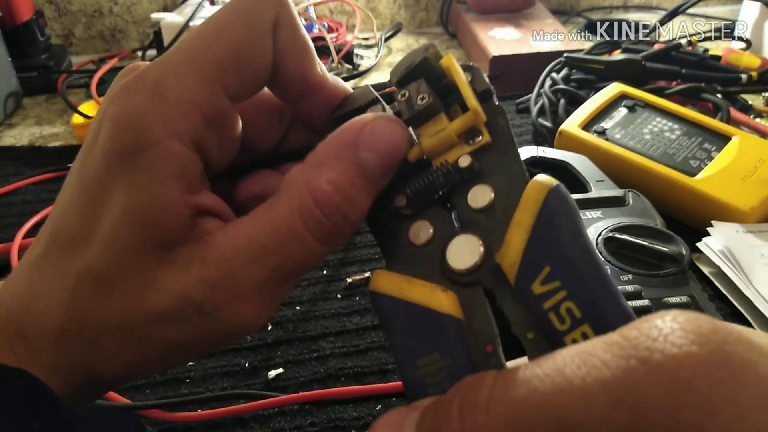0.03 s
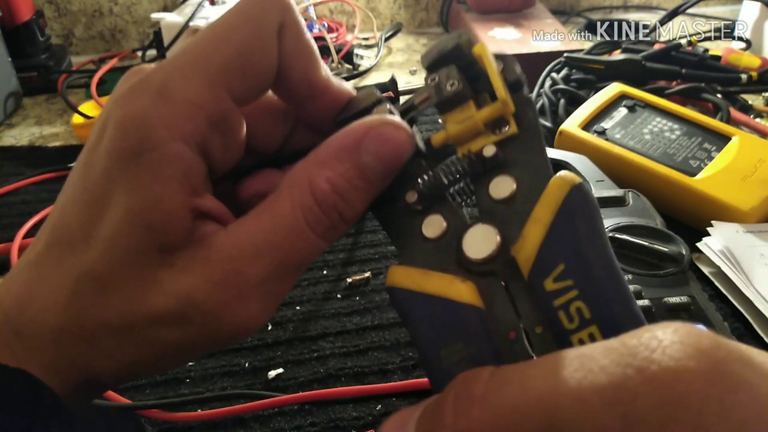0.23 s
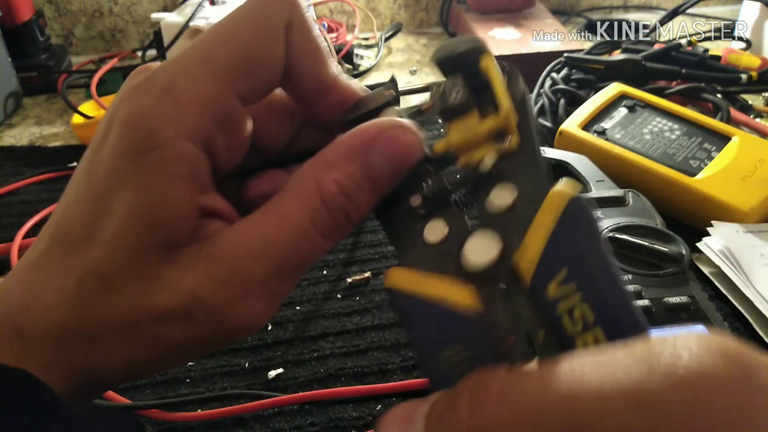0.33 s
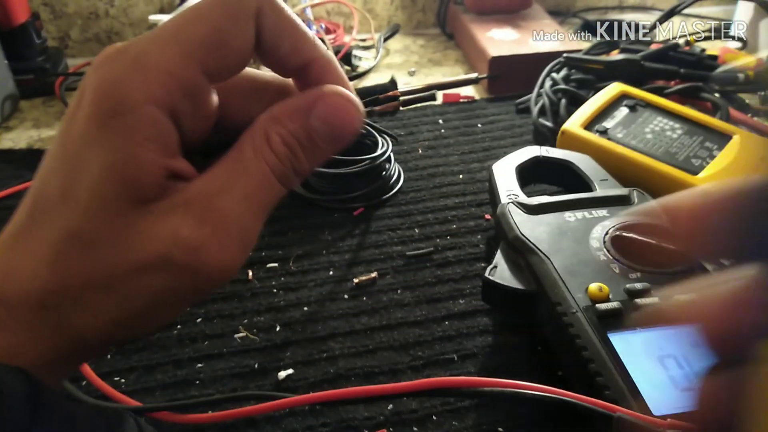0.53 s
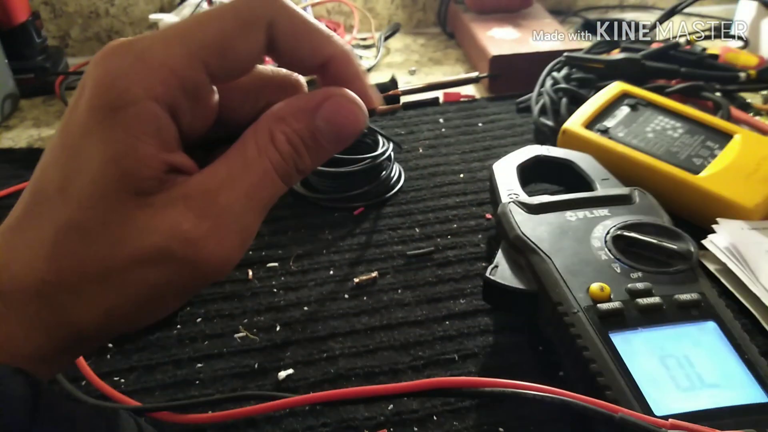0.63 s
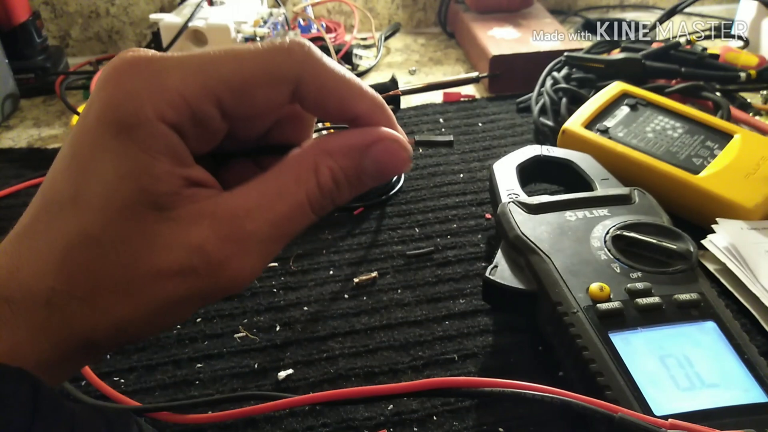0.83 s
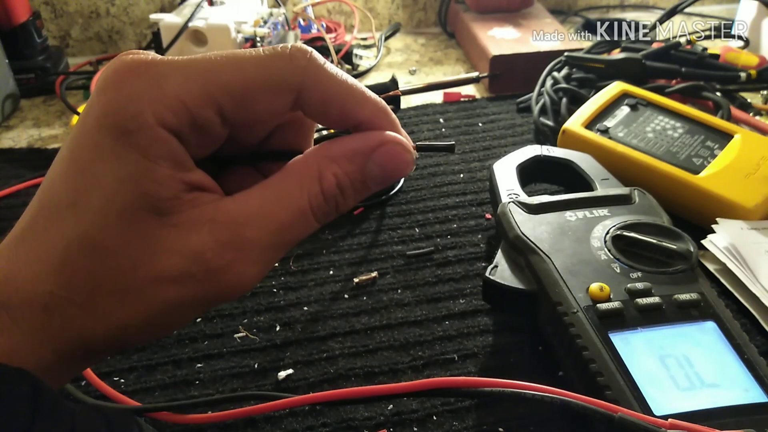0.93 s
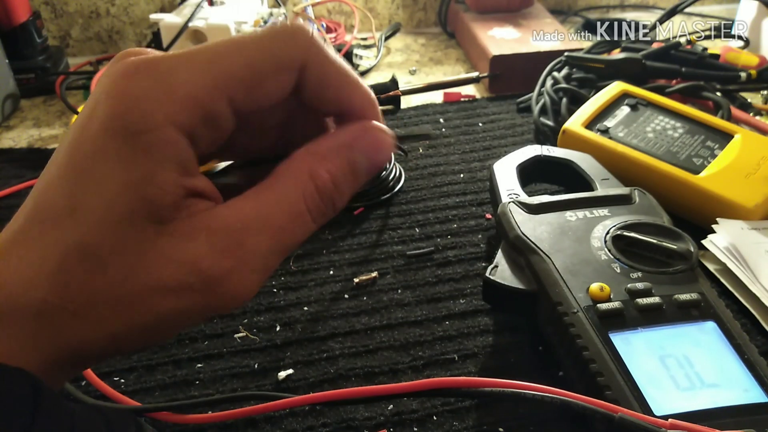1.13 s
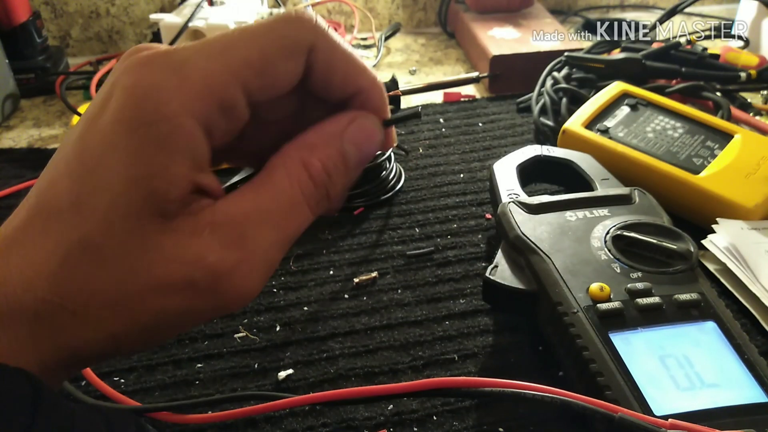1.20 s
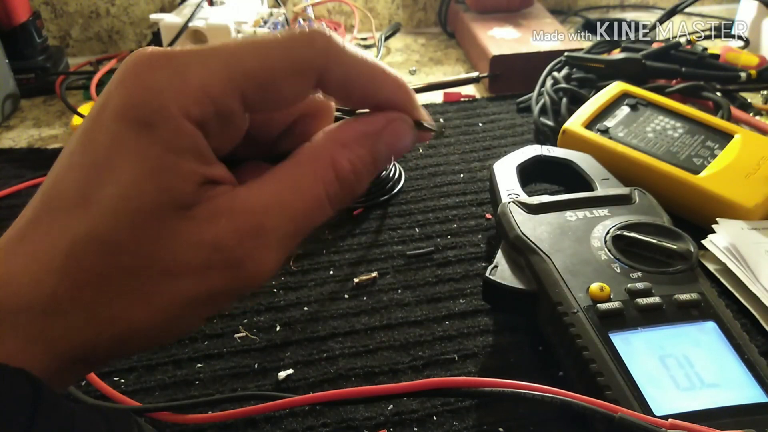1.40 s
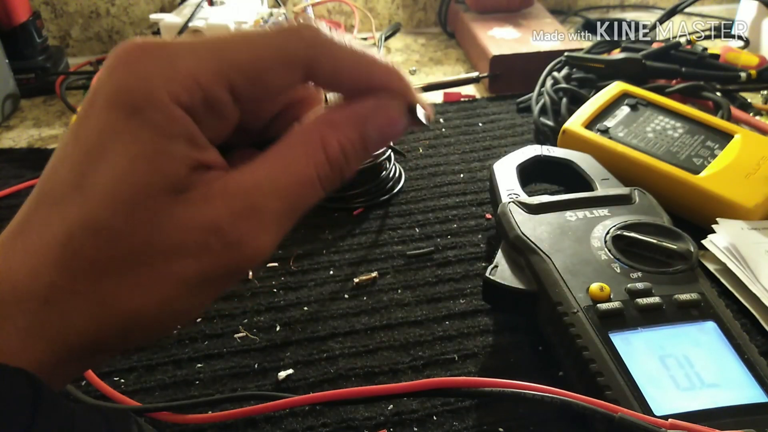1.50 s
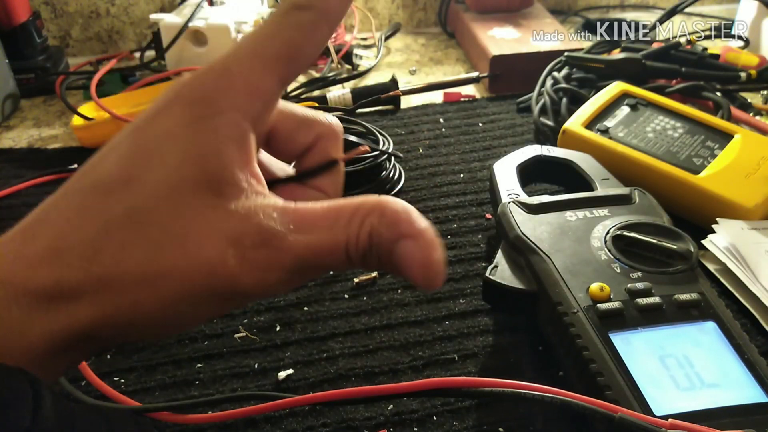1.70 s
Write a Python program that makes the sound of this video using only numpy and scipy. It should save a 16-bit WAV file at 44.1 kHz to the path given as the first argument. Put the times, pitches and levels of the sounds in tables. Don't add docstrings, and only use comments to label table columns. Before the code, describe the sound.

A wire stripper's steel jaws snap shut with a loud, sharp click at 0.23 seconds, close to the microphone. A small ping at 0.38 leads into a dense metallic clatter from 0.41 to 0.47, with a low bench thud. Afterwards only very faint grainy finger rubs and tiny wire ticks, around 1.15, 1.3, 1.45 and 1.57, over steady low mains hum, rumble and hiss in a small room.

```python
import sys
import numpy as np
from scipy import signal
from scipy.fft import rfft, irfft, next_fast_len
from scipy.io import wavfile
from scipy.ndimage import map_coordinates

SR = 44100
rng = np.random.default_rng(int(sys.argv[2]) if len(sys.argv) > 2 else 0)


def gain_from_decibels(decibels):
    exponent = np.asarray(decibels, float) / 20
    return 10 ** exponent


def bounce(signal):
    frames = np.transpose(np.atleast_2d(signal))
    limited = np.clip(frames, -1, 1)
    pcm = np.round(limited * 32767).astype(np.int16)
    wavfile.write(sys.argv[1], SR, pcm)


N = 77175
TIME = np.arange(N) / SR
SIDE = np.array([[.5], [-.5]])


def along(points, hz):
    f, value = np.transpose(points)
    return np.interp(np.log(hz + 1), np.log(f + 1), value)


def unit(x):
    return x / np.sqrt(np.mean(x ** 2) + 1e-20)


def filtered(x, response):
    m = next_fast_len(N + 8192)
    return irfft(rfft(x, m) * response(np.fft.rfftfreq(m, 1 / SR)), m)[..., :N]


def band(hz, octaves):
    return lambda f: 1 / (1 + (np.log2((f + 1) / hz) / octaves) ** 6)


def noise():
    return rng.standard_normal((2, N))


def wobble(rate):
    points = rng.standard_normal(int(N * rate / SR) + 4)
    return map_coordinates(points, [np.arange(N) * rate / SR])


def add(out, s, x):
    i = round(s * SR)
    out[..., i:i + x.shape[-1]] += x


def strikes(events, modes, attack_s, scatter_db, crack_db, apart):
    focus_db, crack_t60 = 4.5, .0084
    out = np.zeros((2, N + SR))
    t = np.arange(SR // 10) / SR
    hz, level_db, t60 = np.transpose(modes)[..., None]
    turns = np.pi * np.arange(len(modes))[:, None]
    for s, db, pan_db, best_hz in events:
        focus = lambda f: gain_from_decibels(-focus_db * np.log2((f + 1) / best_hz) ** 2)
        level_luck, port_luck = rng.standard_normal((2, 2, len(modes), 1))
        phase_luck, pitch_luck = rng.standard_normal((2, len(modes), 1))
        phase = turns + .57 * phase_luck + apart * port_luck * hz / 4000
        tone = np.sin(2 * np.pi * hz * (1 + .015 * pitch_luck) * t + phase)
        ring = focus(hz) * gain_from_decibels(level_db + scatter_db * level_luck - 60 * t / t60) * tone
        grit = rfft(rng.standard_normal((2, len(t)))) * focus(np.fft.rfftfreq(len(t), 1 / SR))
        crack = gain_from_decibels(crack_db - 60 * t / crack_t60) * irfft(grit, len(t))
        blow = (ring.sum(1) + crack) * (1 - np.exp(-t / attack_s))
        add(out, s, gain_from_decibels(db - 3 + pan_db * SIDE) * blow)
    return out[:, :N]


# (time [s], peak level [dB], left over right [dB], hardest ring [Hz])
SNAPS = [(.2270, -24, -3, 2980), (0.229, -33.5, -2, 4000), (0.2337, -30.5, -6.5, 4000),
         (0.2349, -6, -2.5, 4000), (0.2355, -14, 1, 4500), (.2367, -24, 3.5, 4200),
         (0.2395, -20, 3.5, 6000), (.2420, -26.5, -0.5, 2500), (0.2454, -29, 0.5, 4980),
         (0.251, -30, -1.5, 3000), (0.2519, -30.5, -3.5, 2400), (0.2553, -35, -5.5, 2297),
         (0.2603, -37, -5.5, 2800)]
# (frequency [Hz], level [dB], fade by 60 dB [s])
JAWS = [(1050, -14, .009), (1366, -8.5, 0.0097), (1680, -2.5, .006), (1930, -4, .016), (2400, -5, .012),
        (2940, -7.5, 0.004), (4000, -6.5, .005), (4560, 2.5, 0.0038), (4980, 1, 0.0028), (6000, -10, .005),
        (7100, -7, 0.0046), (7600, -5.5, .006), (8250, -8, .007), (9500, -10, .006)]
# (frequency [Hz], level [dB])
SNAP_ALL_ROUND = [(300, -13.5), (900, -0.5), (1500, -1), (2050, 9), (2700, 6.5), (5000, 3.5), (8500, -6),
                  (14000, -17.5)]


def snap():
    low_hz, top_hz = 601.5, 13900
    jaws = strikes(SNAPS, JAWS, .00016, scatter_db=-.3, crack_db=-6.5, apart=.25)
    direct = filtered(jaws, lambda f: (f / (f - 1j * low_hz)) ** 2 / (1 + 1j * f / top_hz) ** 4)
    blows = np.zeros((2, N))
    for s, db, *_ in SNAPS:
        add(blows, s + .00072, gain_from_decibels([[db], [db]]))
    return gain_from_decibels(5.5) * direct, filtered(blows, lambda f: gain_from_decibels(10.5 + along(SNAP_ALL_ROUND, f)))


# (time [s], peak level [dB], left over right [dB], hardest ring [Hz])
CLASHES = [(.3907, -36, -8, 4800), (.3930, -38, -5, 5200), (.3952, -38, 0.5, 4300), (.4005, -41, -6, 4180),
           (.4058, -44, -0.5, 4300), (.4098, -36.5, -2.5, 4790), (.4129, -13, -2.5, 4988),
           (.4142, -12.5, -3, 5600), (.4156, -13.5, -2.5, 5180), (.4189, -24.5, 6, 5490),
           (.4228, -29.5, -13.5, 5500), (.4250, -17, -5, 2000), (.4262, -13.5, -9.5, 3253),
           (.4296, -23, -17.5, 4407), (.4311, -21, -5.5, 4000), (.4338, -15.5, 3, 4825),
           (.4355, -20, 15.5, 5500), (.4381, -21.5, -6, 5200), (.4414, -17, -8.5, 4000),
           (.4428, -17, -1, 5500), (.4440, -13.5, -3.5, 2200), (.4456, -31.5, -1.5, 4500),
           (.4479, -23.5, -2, 5250), (.4515, -32.5, -4, 4500), (.4540, -19, -6.5, 4600),
           (.4560, -22, 2, 6000), (.4600, -26.5, -1.5, 3970), (.4660, -33, -3, 4600),
           (.4686, -31.5, -4.5, 4200)]
# (frequency [Hz], level [dB], fade by 60 dB [s])
PARTS = [(1451, -4.5, 0.0036), (2035, -7, 0.0074), (2845, -7, 0.0031), (3610, -2, 0.0051),
         (3965, -2.5, 0.0075), (4500, -1.5, 0.0078), (5206, -1.5, 0.0058), (5880, -4, 0.0063),
         (6730, -6, 0.0038), (7475, -10, 0.0043), (8430, -12, 0.0041), (9430, -14.5, 0.0062),
         (11340, -15, 0.0064), (12860, -9.5, 0.01)]


def clashes():
    return strikes(CLASHES, PARTS, .00028, scatter_db=2, crack_db=1.5, apart=1.1)


# (time [s], peak level [dB], left over right [dB], hardest ring [Hz])
PINGS = [
    (.3847, -22, -6, 4600),
    (.3858, -26, -2, 4600),
    (.3907, -27, -15.5, 2600),
]
# (frequency [Hz], level [dB], fade by 60 dB [s])
PIVOT = [(1570, -15.5, .02), (1930, -22.5, .012), (4000, -1, 0.0092), (4600, 4, 0.0055), (6900, -8.5, .005)]


def pings():
    return strikes(PINGS, PIVOT, .000075, scatter_db=1.5, crack_db=-17.5, apart=.36)


# (time [s], level [dB])
RATTLE = [
    (0.385, -54.5),
    (0.407, -68),
    (0.413, -41.5),
    (0.423, -48),
    (0.433, -35),
    (0.448, -35),
    (0.456, -38.5),
    (0.468, -48.5),
    (0.5, -65.5),
]


def rattle():
    hits_per_s, spread_db = 6000, 1.5
    hits = (rng.random((2, N)) < hits_per_s / SR) * noise() * gain_from_decibels(spread_db * noise())

    def body(f):
        total = 0
        for k, (hz, db, t60) in enumerate(PARTS):
            loss = 1j * f * 8 / t60
            total = total + (-1) ** k * gain_from_decibels(db) * loss / (hz * hz - f * f + loss)
        return total

    s, db = np.transpose(RATTLE)
    return unit(filtered(hits, body)) * gain_from_decibels(np.interp(TIME, s, db, -120, -120))


# (time [s], peak level [dB], hardest ring [Hz])
THUDS = [(.4205, -39, 330), (0.423, -26, 340), (0.4247, -25, 617), (0.4272, -26.5, 503), (.4300, -27, 450),
         (0.431, -30.5, 200), (.4420, -36, 720), (0.4486, -33.5, 200), (0.457, -36, 410),
         (.2700, -50, 1000), (.2950, -54, 950)]
# (frequency [Hz], level [dB], fade by 60 dB [s])
BENCH = [(117.9, 1.5, 0.05), (250, -4, 0.016), (372, -1, 0.028), (490, 0, 0.036), (600, -7, 0.025),
         (740, 0, 0.022), (860, -4.5, 0.026)]


def thuds():
    pan_db = -10
    jolt = (.2335, -38, 300)
    blows = [(s, db, pan_db, hz) for s, db, hz in THUDS + [jolt]]
    return strikes(blows, BENCH, .00022, scatter_db=1, crack_db=-32.5, apart=6.35)


# (time [s], level [dB])
SWAYS = [
    (0.2317, -40),
    (0.438, -20.5),
    (0.503, -35),
]


def sways():
    hz, rise_s, t60, pan_db, lead = 53.26, .016, .1, -1, 1
    out = 0
    for s, db in SWAYS:
        t = np.clip(TIME - s, 0, None)
        swing = np.sin(lead * SIDE - 2 * np.pi * hz * t)
        out = out + gain_from_decibels(db + pan_db * SIDE - 60 * t / t60) * (1 - np.exp(-t / rise_s)) * swing
    return out


# (time [s], level [dB], left over right [dB], centre [Hz])
TICKS = [
    (.0755, -55, 0, 1250),
    (.0755, -58, 0, 2700),
    (1.1470, -66, 0, 4200),
    (1.4490, -61, 0, 2900),
    (1.4560, -64, 0, 4000),
    (1.5710, -62, -6, 3900),
]


def ticks():
    fall_s, octaves = .0015, .6
    out = 0
    for s, db, pan_db, hz in TICKS:
        burst = noise() * (TIME > s) * np.exp(-abs(TIME - s) / fall_s)
        out = out + gain_from_decibels(db + 10.5 + pan_db * SIDE) * filtered(burst, lambda f: band(hz, octaves)(f) ** 2)
    return out


# (start [s], rise [s], fall [s], level [dB], centre [Hz])
BRUSHES = [(-.02, 0.0067, 0.095, -70, 9300), (0.006, 0.012, 0.015, -70, 1500),
           (0.04, 0.05, 0.15, -82, 2400), (0.14, .05, .04, -78, 750), (0.148, 0.055, 0.061, -66, 4613),
           (0.698, .05, 0.1, -82, 1500), (1.099, .045, 0.039, -71, 5240), (1.13, 0.043, .1, -78, 6600),
           (1.14, 0.083, 0.059, -71, 1300), (1.294, 0.019, 0.054, -68, 5894),
           (1.3, .025, 0.099, -75.5, 7830), (1.447, .004, 0.068, -69.5, 5500),
           (1.447, 0.0035, .02, -74, 14270), (1.448, 0.0062, 0.05, -69.5, 9060),
           (1.448, 0.0029, 0.025, -75, 2420), (1.449, .008, .035, -70, 3800),
           (1.575, 0.02, 0.09, -78, 5500), (1.576, .025, 0.02, -73, 3700), (1.59, 0.03, 0.049, -80, 1260)]
# (time [s], level [dB])
HANDLING = [
    (0, -74.5),
    (.15, -82.5),
    (.65, -89),
    (1.05, -100),
    (1.15, -81),
    (1.35, -84),
    (1.5, -88.5),
    (1.75, -97.5),
]


def brushes():
    rustle_db = np.interp(TIME, *np.transpose(HANDLING)) + 3.1 * wobble(28)
    out = gain_from_decibels(rustle_db) * unit(filtered(noise(), band(2500, 1.4)))
    for s, rise, fall, db, hz in BRUSHES:
        shape = np.clip((TIME - s) / rise, 0, 1) ** 1.6
        shape = shape * np.exp(-np.clip(TIME - s - rise, 0, None) / (fall / 2))
        out = out + gain_from_decibels(db + 1.8 * wobble(170)) * shape * unit(filtered(noise(), band(hz, .32)))
    return out


# (frequency [Hz], fade by 60 dB [s])
ROOM = [(200, 0.48), (600, 0.098), (1000, 0.24), (2000, 0.2), (3000, 0.24), (6000, 0.29), (13000, 0.23)]
# (frequency [Hz], level [dB])
WALLS = [(200, -19.5), (600, -8.5), (1200, 0.5), (2200, 5.5), (5500, 1.5), (8000, -1), (13000, 6.5)]


def room(x):
    near_db, near_delay_s, near_t60 = -13.5, .001011, .05
    wall_db, wall_delay_s = -13, .0045
    hz, t, z = signal.stft(rng.standard_normal((2, SR // 2)), SR, nperseg=256)
    tail = signal.istft(z * gain_from_decibels(-60 * t / along(ROOM, hz)[:, None]), SR, nperseg=256)[1]
    near = rng.standard_normal((2, SR // 10)) * gain_from_decibels(-60 * np.arange(SR // 10) / SR / near_t60)

    def answer(echo, delay_s):
        late = np.pad(x, ((0, 0), (round(delay_s * SR), 0)))
        return signal.fftconvolve(late, echo / np.linalg.norm(echo[0]), axes=1)[:, :N]

    wet = gain_from_decibels(wall_db) * answer(tail, wall_delay_s) + gain_from_decibels(near_db) * answer(near, near_delay_s)
    return filtered(wet, lambda f: gain_from_decibels(along(WALLS, f)))


# (frequency [Hz], level [dB])
LEFT_PORT = [(500, 5), (2000, 1.5), (4500, -1), (7000, 10), (9000, 5.5), (12000, 0), (14300, 0),
             (15200, -35.5)]
RIGHT_PORT = [(500, 6.5), (2000, 3.5), (4500, -0.5), (7000, -0.5), (8600, 0), (9600, -13.5), (13000, -14),
              (14500, -35)]


def ports(x):
    lag_s = .00025

    def response(f):
        shade = gain_from_decibels([along(LEFT_PORT, f), along(RIGHT_PORT, f)])
        return shade * np.exp(-2j * np.pi * f * lag_s * SIDE)

    return filtered(x, response)


# (frequency [Hz], rms level [dB])
HUM = [
    (60, -83.5),
    (120, -48.5),
    (240, -81.5),
    (360, -95.5),
]


def hum():
    start_s, pan_db, waver_db = .0013, 2, .3
    lead = np.array([[-.21], [0]])
    out = 0
    for hz, db in HUM:
        level = np.sqrt(2) * gain_from_decibels(db + pan_db * SIDE + waver_db * wobble(7.9))
        out = out + level * np.sin(2 * np.pi * hz * (TIME + start_s) + lead)
    return out


# (frequency [Hz], level [dB per Hz])
RUMBLE = [(20, -12), (38, -12), (55, -7.5), (80, 2.5), (150, -7.5), (200, -12), (250, -8), (500, -25.5)]


def rumble():
    alike = .83
    a, b = filtered(noise(), lambda f: gain_from_decibels(np.where((f > 15) & (f < 900), along(RUMBLE, f), -120)))
    angle = np.arccos(alike) / 2
    middle, edge = np.cos(angle) * a, np.sin(angle) * b
    return gain_from_decibels(-69.5 + 2 * wobble(40)) * unit(np.array([middle + edge, middle - edge]))


# (frequency [Hz], level [dB per Hz])
AIR = [(400, -10.5), (600, -6.5), (800, -9), (1200, 0.5), (2600, -5.5), (5500, -12), (12500, -15),
       (14000, -43)]


def hiss():
    air = unit(filtered(noise(), lambda f: gain_from_decibels(along(AIR, f))))
    return gain_from_decibels(-84 - 1.5 * SIDE + .41 * wobble(27)) * air


def scene():
    jaws, spread = snap()
    steel = clashes() + pings() + rattle() + ticks()
    wood = thuds() + sways()
    wet = room(spread + steel + wood)
    return ports(jaws + steel + wet) + wood + brushes() + hum() + rumble() + hiss()


def band_limit(x):
    return signal.sosfilt(signal.butter(12, 15290, fs=SR, output="sos"), x)


def record(dry):
    return band_limit(dry)


dry = scene()
out = record(dry)
bounce(out)
```